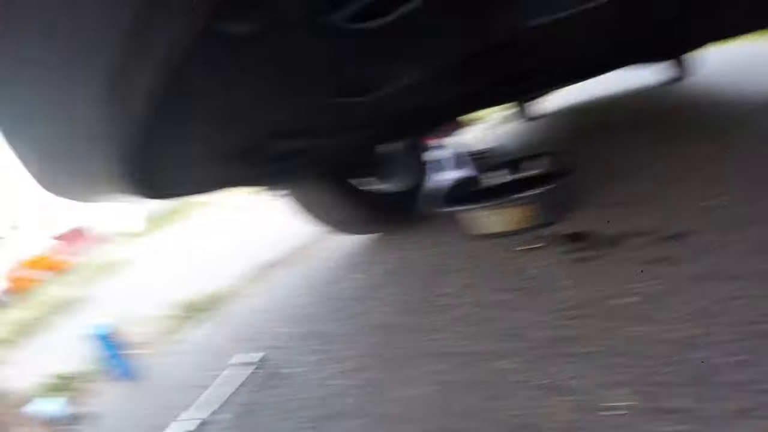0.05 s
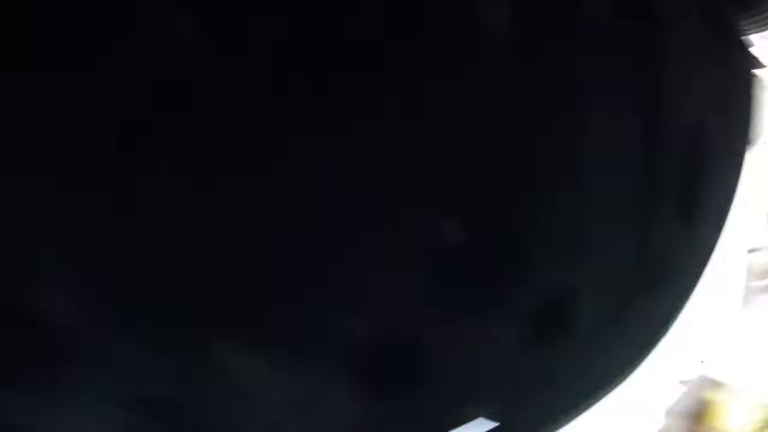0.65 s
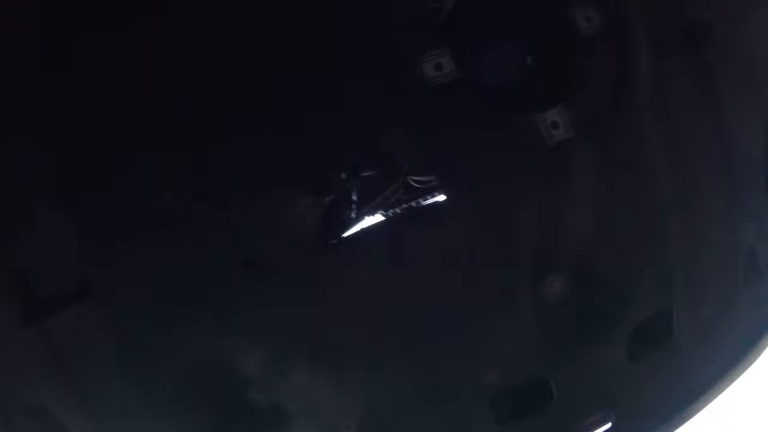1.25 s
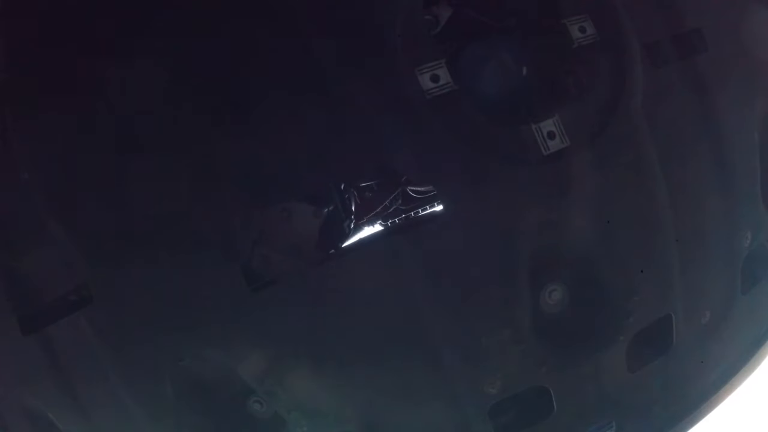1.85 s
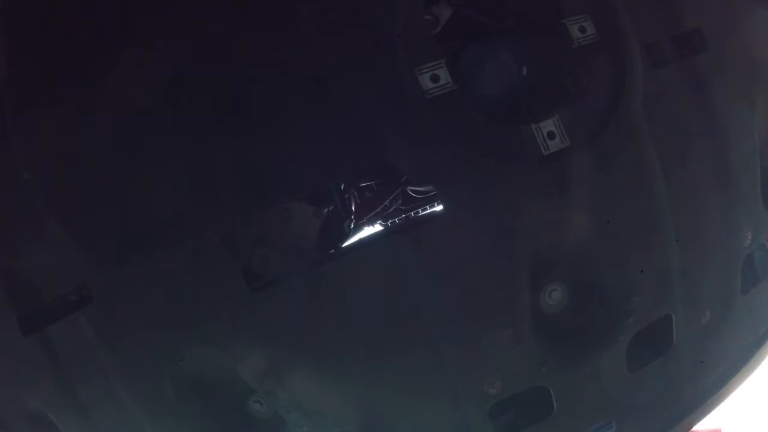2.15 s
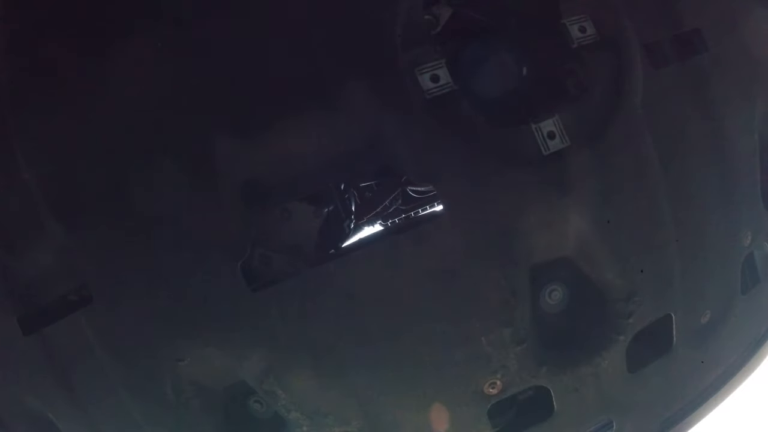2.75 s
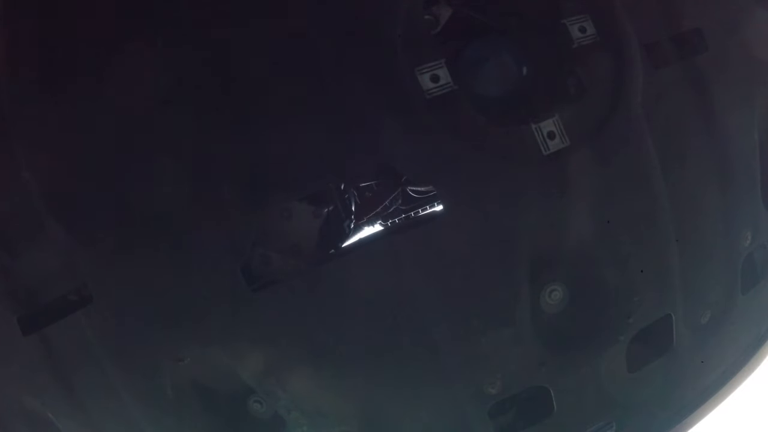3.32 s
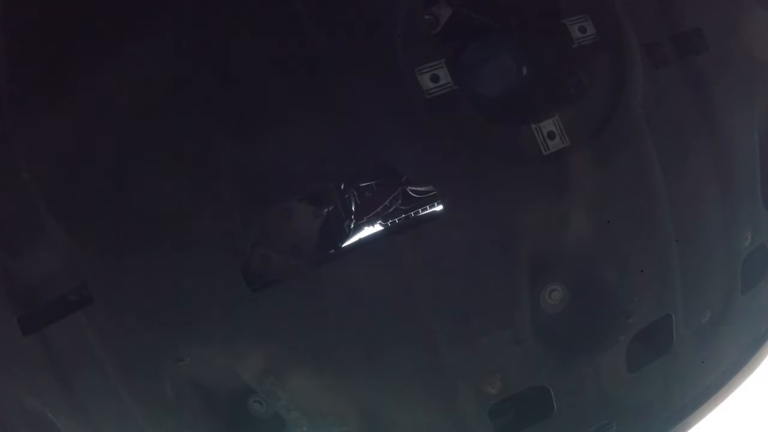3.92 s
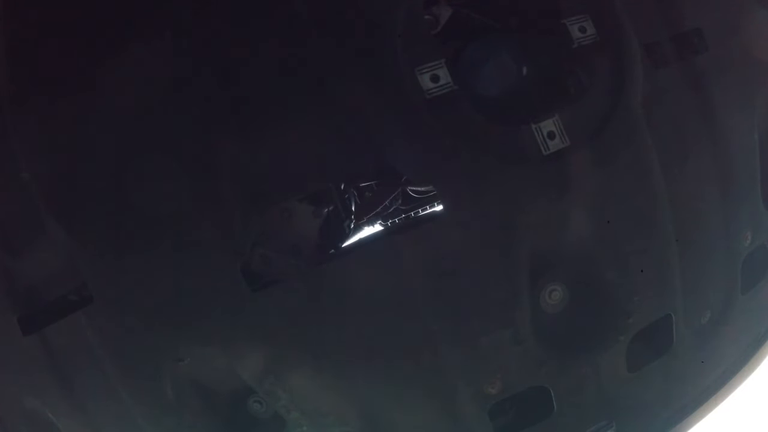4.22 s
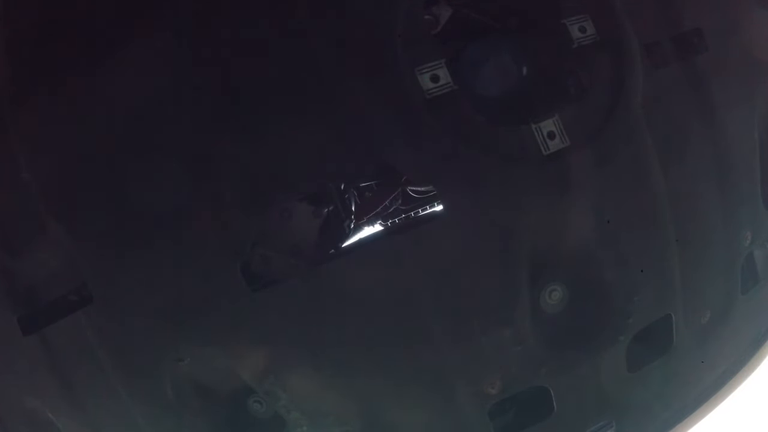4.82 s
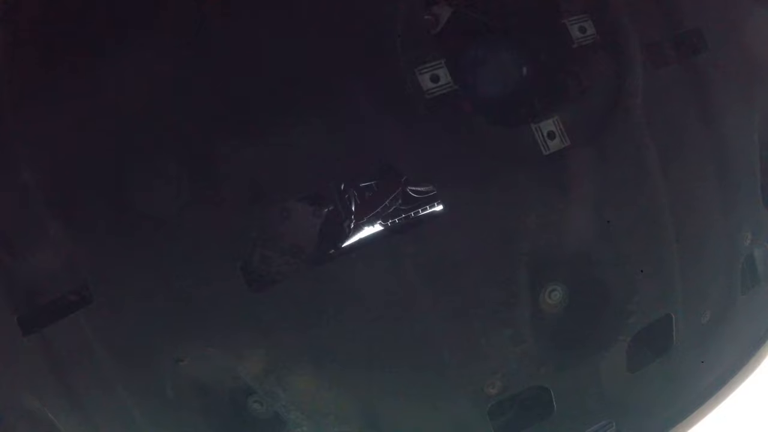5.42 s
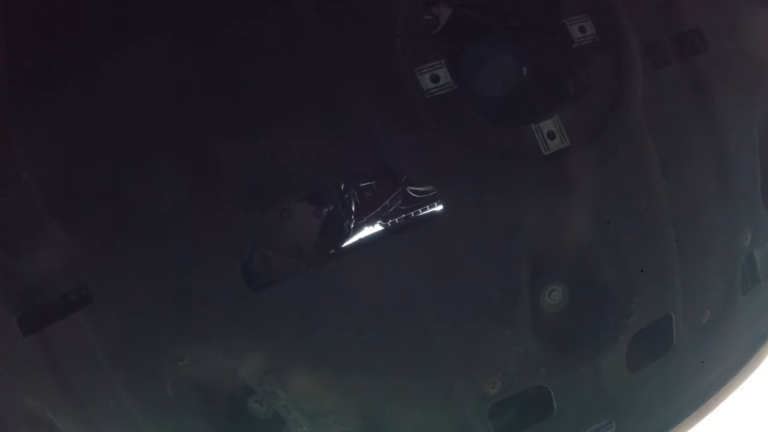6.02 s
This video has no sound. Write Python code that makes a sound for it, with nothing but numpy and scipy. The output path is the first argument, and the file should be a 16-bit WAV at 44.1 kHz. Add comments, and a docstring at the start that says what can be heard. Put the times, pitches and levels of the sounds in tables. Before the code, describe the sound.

A camera knocks and thuds down under a car, then a hard part clacks and scrapes lightly and a sleeve rustles.

```python
"""A hand shifts its grip on a small camera and swings it under a parked car. At about 1 s it is set down:
impacts make the case knock, thud and rock on grit, the gain control ducks, and a low drone sets in.
From 2 s a hard part is scraped and rattled close by, under the floor pan; stick-slip friction and
rebounding blows excite its modes, and a faint metal note lingers. From 4.6 s a sleeve rasps and rustles
among a few light ticks and taps, while the drone fades into the quiet outdoor background."""
import sys
import numpy as np
from scipy import signal
from scipy.fft import rfft, irfft, next_fast_len
from scipy.io import wavfile

SR = 44100
rng = np.random.default_rng(int(sys.argv[2]) if len(sys.argv) > 2 else 0)


def dump_mix(stems):
    """Bounce the given channels to the path in sys.argv[1] as a 16-bit WAV at rate SR."""
    frames = np.atleast_2d(stems).T  # one column per channel
    limited = np.clip(frames, -1, 1)  # hard clip at full scale
    pcm = np.round(limited * 32767).astype(np.int16)
    wavfile.write(sys.argv[1], SR, pcm)


N = 267448
T = np.arange(N) / SR

# Levels are relative within each table; T60 is the time to decay by 60 dB.
# hard knocks on the camera case, then a rasp and a light tick as the sleeve slides:
# t/s, level/dB, contact resonance f/Hz, T60/s, quality factor Q
CONTACTS = [(.358, -43, 1580, 0.076, 1.2), (.435, -37, 1220, 0.012, 1.1), (.548, -42.5, 2350, 0.01, 2.8),
            (.9218, -10.5, 2580, 0.0084, 1.8), (1.0728, -3.5, 2310, 0.017, 1.7),
            (1.075, -3, 4550, 0.0081, 2.3), (1.2041, -3.5, 1360, 0.01, 1.8), (1.217, -17, 1500, 0.0051, 1),
            (1.247, -13, 1400, 0.011, 0.56), (1.2519, -6, 2740, 0.014, 0.91),
            (1.4476, -14.5, 595, .0068, 2), (1.4555, -21.5, 740, .018, 1.95),
            (1.4664, -21, 4500, .009, 0.76), (1.477, -17.5, 550, 0.016, 1.6),
            (1.4833, -15, 1700, 0.011, 0.85), (1.6108, -22.5, 3400, 0.0049, 2.5),
            (1.631, -39, 3630, 0.011, 2.8), (4.636, -43, 2300, 0.16, 4.4), (5.001, -34, 3500, 0.088, 1.2)]
# broad response of the case: f/Hz, level/dB
CASE_SPECTRUM = [(60, -15), (250, 6.5), (1100, -1), (1500, -1.5), (3000, -6.5), (7000, -1.5), (8500, 0),
                 (11500, -8), (15000, -16.5)]
# modes of the case: f/Hz, bandwidth/Hz, level/dB
CASE_MODES = [(602, 21, 8.5), (2160, 170, -1), (3640, 1000, -7.5), (6750, 220, 9.5)]
# soft blows of palm and ground: t/s, f/Hz, level/dB, rise/cycles
SOFT_BLOWS = [(.285, 199, -33, 1.5), (.428, 169.5, -17.5, 1.7), (.435, 270, -11, 0.5),
              (.467, 183, -19.5, 1.05), (0.55, 176.7, -31, 2), (.923, 255, -17.5, 1.17),
              (.95, 159, -26, 2.5), (1.06, 158, -9.5, 2.5), (1.071, 210, -2, 0.58), (1.2, 228, 3, 0.43),
              (1.217, 201, -2.5, 0.69), (1.2519, 646, 3, 0.69), (1.272, 151, 0, .45),
              (1.45, 476, -17, 0.59), (1.466, 151, -3, 0.57), (1.477, 428, 4, 0.87),
              (3.169, 410, -24.5, 0.54), (3.333, 176, -12.5, 0.41), (3.333, 392, -23, 0.57),
              (4.339, 286, -34.5, 0.62)]
# the camera lands and rocks: t/s, f/Hz, level/dB, rocking interval/s, change per rock/dB
CAMERA_LANDINGS = [(1.208, 139, 6, .034, -1.5), (1.502, 112, 6, 0.039, -12), (1.607, 92, -6, 0.033, -6.5),
                   (1.746, 66.7, -28.5, 0.068, -3.5)]
# grit rolling under the case: t/s, duration/s, level/dB, growth/dB
GRIND_STROKES = [(1.199, 0.014, -12, 13.5), (1.244, 0.016, -6.5, 5), (1.449, 0.039, -11.5, 13),
                 (1.604, 0.022, -21.5, -22)]
# its crunch, carried through the case: f/Hz, level/dB
GRIND_SPECTRUM = [(30, 12), (80, -14.5), (190, 5.5), (600, -9.5), (1100, -29.5), (2000, -45),
                  (12000, -64.5)]
# single grains ticking under the case, and two light ticks during the sleeve: t/s, level/dB
GRAIN_TICKS = [(1.063, -34.5), (1.2375, -43), (1.267, -41), (1.2705, -41), (1.5185, -46.5), (1.542, -45),
               (1.576, -47), (1.671, -50), (5.225, -47.5), (5.967, -51.5)]
# the tick of a grain: f/Hz, level/dB
GRAIN_SPECTRUM = [(2300, -8), (3600, 2.5), (4800, -4.5), (6800, -6), (11000, -27)]
# strikes of the hard part: t/s, mid-band level/dB, body re mid/dB, edge re mid/dB, T60/s,
# rebound delay/s, rebound re strike/dB, f/Hz favoured by the spot struck
PART_STRIKES = [(2.083, -35.5, -8.5, -4.5, .059, .026, 1, 3700),
                (2.154, -37.5, -5, -15, 0.017, .0072, -5, 3500),
                (2.171, -23.5, -20.5, -5, 0.016, 0.01, -12, 3620),
                (2.297, -32.5, -9, -14, 0.027, 0.012, -26, 2420),
                (2.346, -27.5, -13.5, -0.5, 0.018, 0.029, -1, 3140),
                (2.502, -29.5, -13, -6, 0.016, 0.022, -1.5, 1660),
                (3.0965, -23.5, -8, -5, 0.047, 0.03, -8, 6470),
                (3.158, -44, -1.5, -17.5, 0.075, 0.012, 6, 2550),
                (3.334, -22, -13, -14.5, 0.06, .017, -2.5, 2930),
                (3.363, -30.5, -9.5, -14, 0.034, 0.03, -9, 2660),
                (3.402, -20.5, -15.5, -17, 0.048, 0.038, -11, 2740),
                (3.468, -32.5, -20, -11, 0.031, 0.023, -5.5, 2930)]
# distinct modes of the part: f/Hz, bandwidth/Hz, level/dB
PART_RESONANCES = [(754, 44, -1.5), (1343, 130, 1.5), (1690, 32, 3), (1960, 54, 5), (2260, 33, -1),
                   (2505, 51, 2), (2610, 26, 4), (2780, 83, -1), (3070, 180, 7.5), (3426, 167, 4.5),
                   (3786, 43, 5.5), (5170, 330, -8.5), (5760, 150, -4.5), (6480, 155, 0),
                   (9120, 880, -12.5)]
# its dense, overlapping modes: f/Hz, level/dB
PART_SPECTRUM = [(200, -4.5), (700, -5.5), (1000, -10.5), (2000, -1.5), (3700, 0.5), (4400, -11),
                 (6900, -4.5), (8200, -16), (11000, -51), (15000, -70.5)]
# hard drags of the part: t/s, duration/s, level/dB, growth/dB, creak f/Hz
DRAG_STROKES = [(2.171, 0.029, -20.5, -3.5, 1390), (2.215, 0.034, -24, -2, 1660),
                (2.243, 0.029, -23.5, -4, 3750)]
# light rubs of hand and part: t/s, duration/s, level/dB, growth/dB
RUB_STROKES = [(1.0, 0.082, -41, 11), (1.1, 0.26, -51, 9), (1.33, 0.063, -45, 19),
               (1.71, 0.055, -40.5, -7.5), (1.784, 0.0061, -38, -1.5), (1.902, 0.0069, -38.5, -8),
               (1.935, 0.061, -42, -6), (2.035, 0.71, -55, -3.5), (2.48, 0.028, -45, 14),
               (2.6, 0.1, -56, 3), (2.942, 0.14, -54.5, -18), (3.275, 0.27, -48, -6.5),
               (3.582, 0.065, -45, -6), (3.803, 0.033, -45.5, 2), (4.184, .008, -44.5, -4),
               (4.2, 0.261, -56.5, 7.5)]
# timbre of a drag and of a rub: f/Hz, level/dB
DRAG_SPECTRUM = [(500, -3), (1500, 5.5), (3000, -2), (4200, 2), (9000, -7.5)]
RUB_SPECTRUM = [(700, -7), (1700, -4), (3000, 2.5), (4500, -0.5), (8000, -2.5)]
# light taps on metal: t/s, level/dB, f/Hz, T60/s
METAL_TAPS = [(3.224, -40, 2300, 0.073), (4.39, -32, 3220, 0.059), (5.748, -44.5, 1885, .1),
              (5.856, -45, 3640, 0.043)]
# the hand sliding on the camera: t/s, duration/s, level/dB, growth/dB
GRIP_STROKES = [(.005, 0.088, -47, -21), (.115, .035, -41, 3), (.185, 0.034, -31.5, 0),
                (.25, 0.32, -54.5, -12), (.99, 0.052, -35, 8)]
# friction noise of skin: f/Hz, level/dB
GRIP_SPECTRUM = [(70, -34), (150, 0.5), (300, -5.5), (450, -27.5), (950, -22), (1400, -29), (1850, -21),
                 (3000, -37.5), (6500, -51.5), (12000, -69)]
# a sleeve sliding: t/s, duration/s, level/dB, growth/dB
SLEEVE_STROKES = [(.08, 0.16, -56.5, 0), (.352, 0.068, -57, -4), (4.615, 0.12, -43.5, 0.5),
                  (4.78, 0.29, -48.5, 7.5), (5.212, 0.06, -49.5, -3), (5.3, 0.22, -58, 6),
                  (5.595, 0.011, -46, -2), (5.77, 0.089, -51, 3)]
# friction noise of cloth: f/Hz, level/dB
SLEEVE_SPECTRUM = [(150, -10), (500, -2.5), (1000, -2.5), (1600, -3), (2300, -4), (3400, -3), (5500, -7.5),
                   (10000, -17), (11000, -37), (15000, -33)]
# low drone: f/Hz, level/dB
DRONE_SPECTRUM = [(18, -27), (30, -7), (62, -5), (84, -0.5), (108, -11.5), (132, -4), (155, -21.5),
                  (300, -39), (900, -76)]
# outdoor murmur and microphone hiss: f/Hz, level/dB
AIR_SPECTRUM = [(25, -9), (90, -45), (135, -2), (190, 1.5), (330, -10.5), (500, -14.5), (750, -13.5),
                (1500, -20), (2600, -25), (4700, -35.5), (7700, -30), (12000, -38.5), (15000, -42)]


def contacts(tail_db=-42, tail_t60=0.07):
    """Mass-spring resonance low-passes impulse and chatter: case knocks, then a sleeve's rasp and tick."""
    out, t = np.zeros(N), T[:SR // 8]
    for start, db, contact_hz, t60, q in CONTACTS:
        force = rng.standard_normal(len(t)) * (fade(t, t60) + undb(tail_db) * fade(t, tail_t60))
        force[0] = 1
        w = 2 * np.tan(np.pi * contact_hz / SR)  # prewarped angular frequency
        contact = signal.bilinear([w * w], [1, w / q, w * w])
        ring = signal.lfilter(*contact, colour(force, CASE_SPECTRUM, CASE_MODES))
        add(out, start, undb(db) * ring / np.std(ring[:SR // 250]))  # level set over the first 4 ms
    return out


def thuds(wobble_rad=0.27):
    """Damped oscillation: each soft blow or rock swings the camera up, and the motion soon dies."""
    out, t = np.zeros(N), T[:SR // 3]
    for start, hz, db, rise_cycles in SOFT_BLOWS + rocks():
        age = t * hz / rise_cycles
        wobble = wobble_rad * unit(band(rng.standard_normal(len(t)), hz, "low"))
        swing = (age * np.exp(1 - age)) ** 0.92 * np.sin(2 * np.pi * hz * t + wobble)
        # each blow is high-passed at half its pitch, so little sounds far below it
        add(out, start, undb(db) * band(swing, hz / 2, "high", order=3))
    return out


def rocks(count=4, rise_cycles=0.31, pitch_ratio=0.96):
    """Damped rocking from edge to edge: rows of evenly spaced blows, each weaker and a little lower."""
    return [(start + k * gap, hz * pitch_ratio ** k, db + k * step_db, rise_cycles)
            for start, hz, db, gap, step_db in CAMERA_LANDINGS for k in range(count)]


def sway(hz=33, sway_db=-11, rise_s=0.042, db_per_db=0.87):
    """Free vibration: each landing sways the camera on its mount, a harder one more widely."""
    out, t = np.zeros(N), T[:SR // 2]
    envelope = t / rise_s * np.exp(1 - t / rise_s)
    for start, _, db, _, _ in CAMERA_LANDINGS:
        wobble = unit(band(rng.standard_normal(len(t)), hz, "low"))
        add(out, start, undb(sway_db + db_per_db * db) * envelope * np.sin(2 * np.pi * hz * t + wobble))
    return band(out, hz / 2, "high")


def grind():
    """Structure-borne sound: grit rolling under the case is carried through it as a dull crunch."""
    crunch = colour(friction(slips_per_s=810, spread_db=0.5, hiss=0.17), GRIND_SPECTRUM)
    return unit(crunch) * strokes(GRIND_STROKES, attack_s=0.0035, release_t60=0.083)


def grit(t60=0.009):
    """Brief contacts have broad spectra: single grains tick brightly under the case, and two light ticks come
    later."""
    out, t = np.zeros(N), T[:SR // 20]
    for start, db in GRAIN_TICKS:
        tick = colour(rng.standard_normal(len(t)) * fade(t, t60), GRAIN_SPECTRUM)
        add(out, start, undb(db) * tick / np.std(tick[:SR // 250]))
    return out


def clacks(gain_db=1, rise_s=0.0026, echo_db=-23, echo_t60=0.081, spot_width_hz=450, spot_db=5):
    """Modal ringing: the part strikes and rebounds once; the gap under the floor pan reverberates."""
    out, t = np.zeros(N), T[:SR // 4]
    onset = (1 - np.exp(-t / rise_s)) ** 2
    echo = undb(echo_db) * fade(t, echo_t60)
    for strike_s, strike_db, body_db, edge_db, t60, gap, rebound_db, spot_hz in PART_STRIKES:
        for start, db in (strike_s, strike_db), (strike_s + gap, strike_db + rebound_db):
            blow = rng.standard_normal(len(t)) * onset * (fade(t, t60) + echo)
            ring = colour(blow, PART_SPECTRUM, PART_RESONANCES)
            # the spot struck favours one pitch and sets the share of low body and bright edge
            ring = colour(ring, [(spot_hz, 0)], [(spot_hz, spot_width_hz, spot_db)])
            for band_hz, band_db in ([1200, 4200], 0), ([300, 1200], body_db), ([4200, 13500], edge_db):
                share = band(ring, band_hz, "band", order=3)
                share /= np.std(share[:SR // 50])  # level set over the first 20 ms
                add(out, start - rise_s, undb(db + gain_db + band_db) * share)
    return out


def scrapes(rub_db=-1, catch_db=2, creak_width_hz=70, creak_db=13):
    """Stick-slip friction drives the part's modes: light rubs sound thin, hard drags creak."""
    fine = colour(friction(slips_per_s=1100, spread_db=2.5, hiss=0.76), PART_SPECTRUM, PART_RESONANCES)
    rub = unit(colour(fine, RUB_SPECTRUM)) * strokes(RUB_STROKES, attack_s=0.0063, release_t60=0.076)
    out = rub * undb(rub_db + catch_db * walk(45))
    hard = colour(friction(slips_per_s=1500, spread_db=2.5, hiss=0.66), PART_SPECTRUM, PART_RESONANCES)
    for *stroke, creak_hz in DRAG_STROKES:
        drag = colour(hard, DRAG_SPECTRUM, [(creak_hz, creak_width_hz, creak_db)])
        out += unit(drag) * strokes([stroke], attack_s=0.0054, release_t60=0.087)
    return out


def pings(overtone_ratio=1.94, overtone_db=-9, tick_db=-6, tick_t60=0.069, waver_rad=0.95):
    """Inharmonic modes: lightly tapped metal gives a tick and an unsteady note with one overtone."""
    out, t = np.zeros(N), T[:SR // 4]
    for start, db, hz, t60 in METAL_TAPS:
        phase = 2 * np.pi * hz * t + waver_rad * walk(300)[:len(t)]
        note = (np.sin(phase) + undb(overtone_db) * np.sin(overtone_ratio * phase)) * fade(t, t60)
        tick = unit(colour(rng.standard_normal(len(t)), PART_SPECTRUM)) * fade(t, tick_t60)
        add(out, start, undb(db) * (note + undb(tick_db) * tick))
    return out


def metal_ring(start_s=2.1, hz=2560, db=-54.5, t60=5):
    """Light damping: one faint, wavering metal mode outlasts the scrape."""
    out, t = np.zeros(N), T[:3 * SR]
    phase = 2 * np.pi * hz * t + walk(51.4)[:len(t)]
    add(out, start_s, undb(db) * fade(t, t60) * np.sin(phase))
    return out * (1 + walk(29.16) / 2)


def grip(gain_db=1, flutter_db=3, low_cut_hz=125):
    """Stick-slip of skin: the hand slides in jerks, each fold favouring another octave for a moment."""
    slide = colour(friction(slips_per_s=830, spread_db=1.5, hiss=0.76), GRIP_SPECTRUM)
    octaves = [band(slide, [hz, 2 * hz], "band") * undb(flutter_db * walk(60))
               for hz in 80 * 2 ** np.arange(8)]
    rustle = unit(sum(octaves)) * strokes(GRIP_STROKES, attack_s=0.021, release_t60=0.21)
    return undb(gain_db) * band(rustle, low_cut_hz, "high", order=4)


def sleeve(gain_db=-1, swell_db=1.3):
    """Sliding friction of cloth: many fine slips merge into a hiss that swells unevenly."""
    slide = colour(friction(slips_per_s=900, spread_db=0, hiss=2.5), SLEEVE_SPECTRUM)
    rustle = unit(slide) * strokes(SLEEVE_STROKES, attack_s=0.013, release_t60=0.22)
    return undb(gain_db + swell_db * walk(28)) * rustle


def background(air_db=-47, drone_db=-37.5, drone_start_s=1.07, hold_s=1.56, fade_db_per_s=13):
    """Ambient noise: steady murmur and hiss, and a low drone that sets in, holds and then fades."""
    air = unit(colour(rng.standard_normal(N), AIR_SPECTRUM)) * undb(air_db)
    age = T - drone_start_s
    drone = unit(colour(rng.standard_normal(N), DRONE_SPECTRUM)) * (age > 0)
    return air + drone * undb(drone_db - fade_db_per_s * np.maximum(age - hold_s, 0))


def friction(slips_per_s, spread_db, hiss):
    """Shot noise: tiny slips of uneven size at random moments, over the hiss of finer ones."""
    slips = (rng.random(N) < slips_per_s / SR) * rng.choice([-1, 1], N)
    sizes = undb(spread_db * np.minimum(rng.exponential(size=N), 3))
    return unit(unit(slips * sizes) + hiss * rng.standard_normal(N))


def strokes(rows, attack_s, release_t60):
    """Amplitude envelope of sliding: each stroke takes hold, grows or eases, then decays."""
    gain = np.zeros(N)
    for start, duration, db, growth_db in rows:
        progress = np.clip((T - start) / duration, 0, 1)
        attack = np.clip((T - start) / attack_s, 0, 1)
        release = fade(np.maximum(T - start - duration, 0), release_t60)
        gain += undb(db + growth_db * (progress - 0.5)) * attack * release
    return gain


def colour(x, spectrum, modes=()):
    """Minimum-phase filter: a smooth spectrum and resonances add in power."""
    size = next_fast_len(len(x) + 4096)
    f = np.arange(size // 2 + 1) * SR / size + 1e-3
    hz, db = np.transpose(spectrum)
    gain = undb(np.interp(np.log(f), np.log(hz), db))
    for centre, width, mode_db in modes:
        resonance = undb(mode_db) / np.hypot(1, 2 * (f - centre) / width)
        gain = np.hypot(gain, resonance)
    # folding the cepstrum makes it causal: nothing rings before the blow
    cepstrum = irfft(np.log(gain), size)
    cepstrum[1:size // 2] *= 2
    cepstrum[size // 2 + 1:] = 0
    return irfft(rfft(x, size) * np.exp(rfft(cepstrum)), size)[:len(x)]


def band(x, hz, kind, order=2):
    """Butterworth filter."""
    return signal.sosfilt(signal.butter(order, hz, kind, fs=SR, output="sos"), x)


def fade(t, t60):
    """Exponential decay by 60 dB in t60 seconds."""
    return np.exp(-np.log(1000) * t / t60)


def walk(rate_hz):
    """Random modulation: interpolated noise with a spread near 1."""
    knots = np.arange(0, N / SR + 1, 1 / rate_hz)
    return np.interp(T, knots, rng.standard_normal(len(knots)))


def undb(db):
    """Decibels to amplitude ratio."""
    return 10 ** (np.asarray(db) / 20)


def unit(x):
    """Normalise to rms 1."""
    return x / np.sqrt(np.mean(x ** 2))


def add(out, start_s, sound):
    """Superpose a sound from start_s on."""
    i = int(start_s * SR)
    out[i:i + len(sound)] += sound[:len(out) - i]


def scene():
    """Superposition: all sources sum at one microphone."""
    handling = contacts() + thuds() + sway() + grind() + grit()
    part = clacks() + pings() + scrapes() + metal_ring()
    return (handling + part + grip() + sleeve() + background())[None]


def record(dry, threshold_db=-4, recovery_db_per_s=32, attack_s=0.0014, ceiling=0.85, top_hz=15400):
    """Automatic gain control ducks fast and recovers slowly; remaining peaks clip; the top is cut."""
    over_db = np.maximum(20 * np.log10(np.abs(dry[0]) + 1e-9) - threshold_db, 0)
    held_db = np.maximum.accumulate(over_db + recovery_db_per_s * T) - recovery_db_per_s * T
    duck_db = band(held_db, 1 / (2 * np.pi * attack_s), "low", order=1)
    clipped = np.clip(dry * undb(-duck_db), -ceiling, ceiling)
    return signal.sosfiltfilt(signal.ellip(8, 0.1, 50, top_hz, fs=SR, output="sos"), clipped)


dry = scene()
out = record(dry)
dump_mix(out)
```